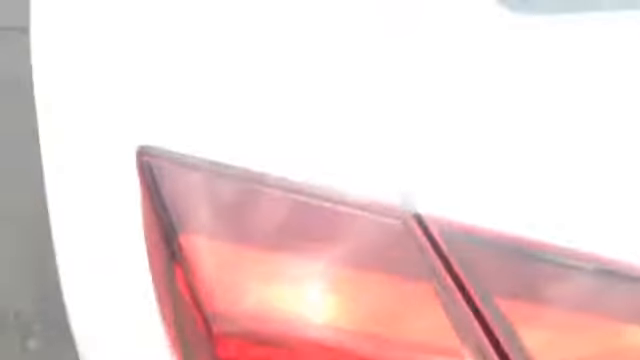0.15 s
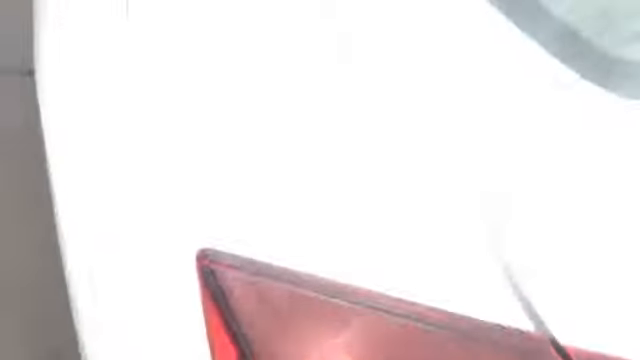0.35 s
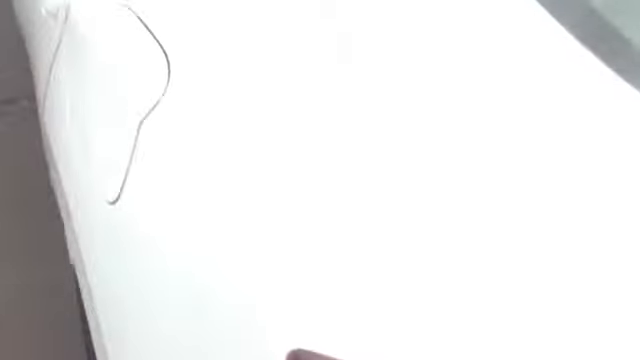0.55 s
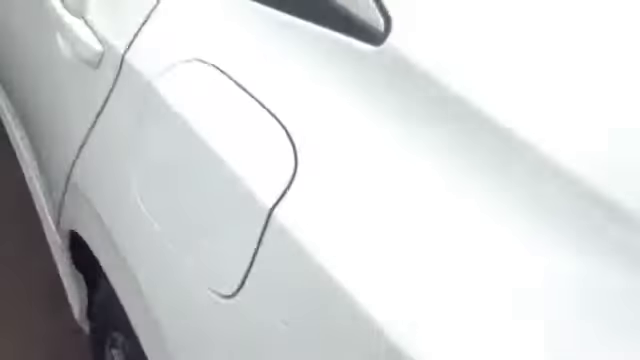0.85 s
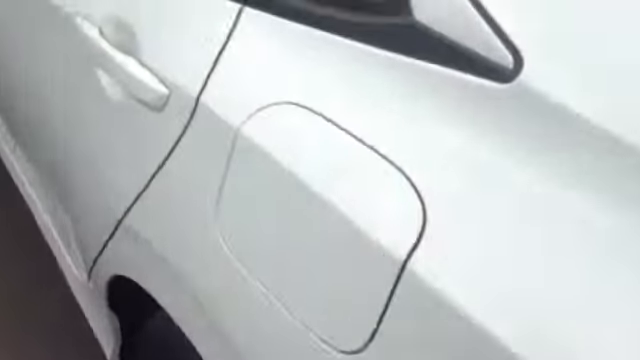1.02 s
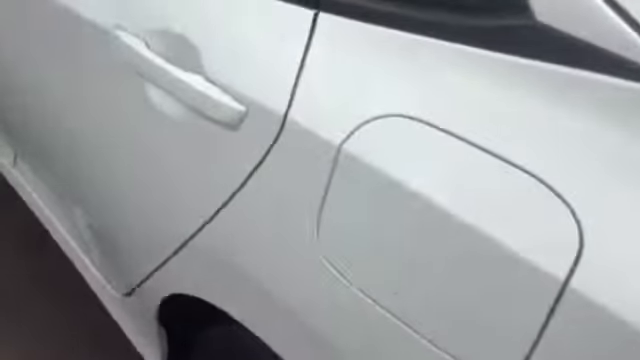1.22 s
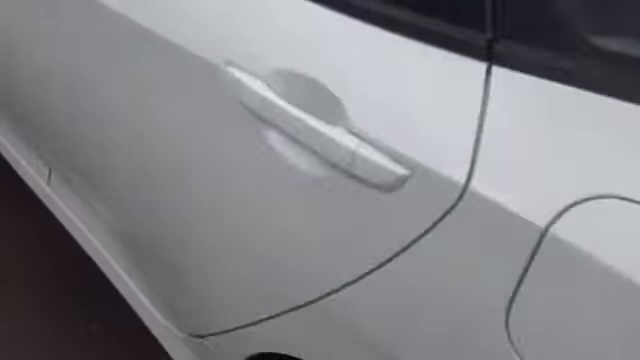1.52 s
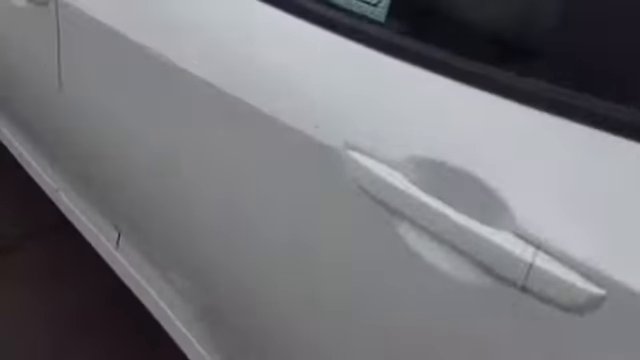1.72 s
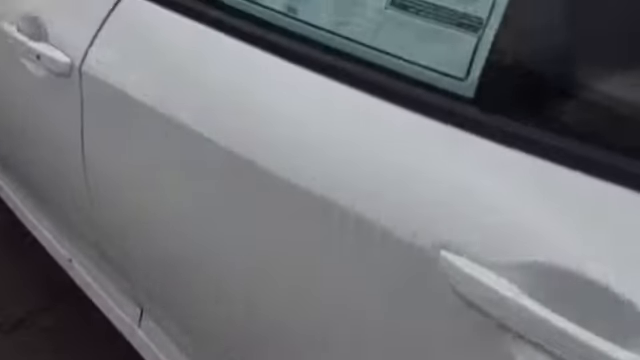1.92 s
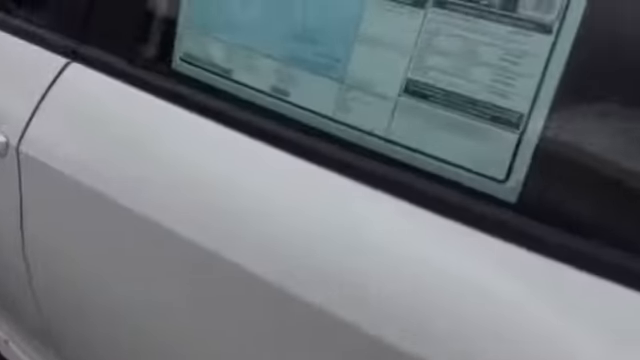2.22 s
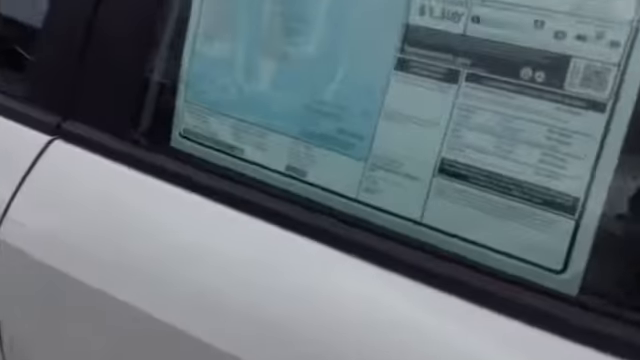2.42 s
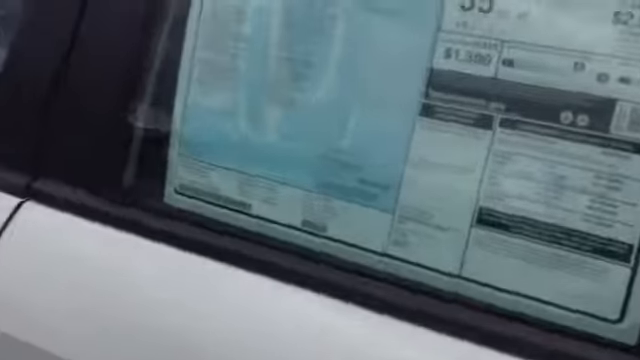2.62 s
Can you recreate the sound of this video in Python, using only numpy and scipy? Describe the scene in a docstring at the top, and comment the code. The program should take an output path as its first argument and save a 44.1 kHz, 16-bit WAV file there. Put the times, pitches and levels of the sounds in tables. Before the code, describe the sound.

A car trunk lid slams shut close by with a clattering latch and a short boom. Faint gritty footsteps, scuffs and tiny metallic jingles follow over distant traffic, ending with a brief rub near the microphone.

```python
"""A car's trunk lid is shut outdoors: the latch clatters home and rings the steel, the lid lands on
its rubber seal, the body booms and loose trim rattles, with a dull tail from the surroundings.
Someone walks along the car with faint taps, crunching grit, scuffs and small metallic jingles.
Distant traffic hums underneath; at the end something rubs close by with a hiss and a rumble."""
import sys
import numpy as np
from scipy import signal
from scipy.fft import irfft
from scipy.io import wavfile

SR = 44100
rng = np.random.default_rng(int(sys.argv[2]) if len(sys.argv) > 2 else 0)


def inscribe(sig):
    """Save sig as 16-bit PCM at rate SR to the path in sys.argv[1].

    A 1-D sig is mono; a 2-D sig holds one channel per row.
    Samples are clipped to [-1, 1] before scaling.
    """
    pcm = np.round(np.clip(np.atleast_2d(sig).T, -1, 1) * 32767)
    wavfile.write(sys.argv[1], SR, pcm.astype(np.int16))


N = 121275
T = np.arange(N) / SR


def from_db(db):
    """Decibels to gain."""
    return 10 ** (np.asarray(db) / 20)


def noise(spectrum):
    """Noise at rms 1, coloured by rows of freq_hz, relative_db."""
    hz, db = np.transpose(spectrum)
    freqs = np.maximum(np.arange(N // 2 + 1) * SR / N, 1)
    low_rolloff = np.minimum(freqs / hz[0], 1) ** 2
    gain = from_db(np.interp(np.log(freqs), np.log(hz), db)) * low_rolloff
    x = irfft(gain * np.exp(2j * np.pi * rng.random(len(freqs))), N)
    return x / x.std()


def burst(start_s, attack_s, t60_s):
    """Envelope that rises quickly and dies away."""
    age = np.maximum(T - start_s, 0)
    return np.minimum(age / attack_s, 1) * from_db(-60 * age / t60_s)


def ring(start_s, hz, t60_s):
    """One struck mode: a decaying sine."""
    age = np.maximum(T - start_s, 0)
    return np.sin(2 * np.pi * hz * age) * from_db(-60 * np.minimum(age / t60_s, 10))


def grain(depth_db, grain_s):
    """Flickering gain: the fast, uneven catching of two sliding surfaces."""
    knots = np.arange(0, T[-1] + grain_s, grain_s)
    return from_db(depth_db * np.interp(T, knots, rng.standard_normal(len(knots))))


def butter(x, hz, kind):
    """Gentle low- or high-pass."""
    return signal.sosfilt(signal.butter(2, hz, kind, fs=SR, output="sos"), x)


# Low wash of the road: freq_hz, relative_db
TRAFFIC_COLOUR = [(25, -23), (45, -34), (70, -9), (100, -12.5), (135, -3.5), (200, 2.5), (300, -1),
                  (380, 1), (520, -8), (680, -4), (880, -1.5), (1300, -11), (2500, -15.5), (3200, -22),
                  (4000, -25), (7000, -30.5), (15000, -32)]

def traffic():
    """Distant traffic blends into a steady, dark bed."""
    return from_db(-52) * noise(TRAFFIC_COLOUR)


# Brushes of shoes and clothing: peak_s, level_db, width_s, relative_hiss_db
SCUFFS = [(0.525, -75, 0.025, 0), (0.723, -64, 0.16, -24), (0.928, -69.5, 0.06, 3),
          (1.075, -59.5, 0.058, -7.5), (1.61, -69, .08, -4), (1.82, -64.5, 0.06, -4.5),
          (2.367, -56, 0.069, -9.5)]
# Midrange swish and the airy hiss on top: freq_hz, relative_db
SWISH_COLOUR = [(300, -15), (1500, 4.5), (2500, 0), (5000, -9.5), (9000, -25), (15000, -50)]
AIR_COLOUR = [(4000, -3), (8000, -11), (11000, 1), (13000, -4), (15000, -7.5)]

def scuffs():
    """Shoes and cloth slide in soft, grainy swishes that swell and fade."""
    swish, hiss = noise(SWISH_COLOUR), noise(AIR_COLOUR)
    out = 0
    for peak_s, db, width_s, hiss_db in SCUFFS:
        swell = np.exp(-.5 * ((T - peak_s) / width_s) ** 2)
        out += from_db(db) * swell * (swish + from_db(hiss_db) * hiss)
    return out * grain(depth_db=1.5, grain_s=0.0053)


# Tiny metal touches: start_s, level_db
JINGLES = [(.925, -60), (.945, -59), (1.101, -49.5), (1.122, -61), (2.357, -48.5)]
# Their thin sparkle: freq_hz, relative_db
JINGLE_COLOUR = [(7000, -9), (9000, -15), (10300, -2), (11000, -2), (12200, 1), (13500, -5), (15000, -8.5)]

def jingles():
    """Something small and metallic, perhaps keys, shifts with the walk."""
    envelope = sum(from_db(db) * burst(start_s, attack_s=.003, t60_s=0.07) for start_s, db in JINGLES)
    return noise(JINGLE_COLOUR) * envelope


# Shoe taps: start_s, level_db, pitch_hz, relative_knock_db
STEPS = [(.437, -38.5, 890, -1.5), (.517, -40.5, 520, -12), (0.7582, -31.5, 850, -12),
         (0.9522, -30, 1090, -19), (1.014, -37, 1500, -28), (1.809, -34, 1560, -6),
         (1.8768, -25, 1470, -13), (2.121, -37, 1500, 6), (2.523, -33.5, 1530, -24)]
# Grit under a sole: start_s, level_db, t60_s
CRUNCHES = [(0.438, -55, 0.048), (1.014, -50.5, 0.031), (1.04, -59, .05), (1.064, -53, .07),
            (1.869, -47.5, 0.041), (1.885, -46, 0.065), (2.119, -70, 0.035), (2.31, -41, 0.058),
            (2.33, -42.5, 0.053), (2.3566, -39, 0.049), (2.4065, -49, 0.17)]
# Tone of the grit: freq_hz, relative_db
GRIT_COLOUR = [(100, 0), (200, 10), (600, 11), (1800, 0), (4000, -2), (8000, -8), (12000, -11),
               (15000, -4.5)]

def footsteps():
    """Shoes hit the paving with a dead tap, a hollow knock of the sole and a click; grit crunches."""
    grit = noise(GRIT_COLOUR)
    taps = 0
    for start_s, db, pitch_hz, knock_db in STEPS:
        tap = from_db(4) * ring(start_s, pitch_hz, t60_s=2.8 / pitch_hz)  # gone in 2.8 cycles
        knock = from_db(knock_db) * ring(start_s, hz=593, t60_s=0.015)
        click = from_db(-14.5) * grit * burst(start_s, attack_s=.0001, t60_s=0.0034)
        taps += from_db(db) * (tap + knock + click)
    crunch = sum(from_db(db) * burst(start_s, 0.0016, t60_s) for start_s, db, t60_s in CRUNCHES)
    return grit * crunch + butter(taps, 378, "high")


# Swell of the rub: time_s, hiss_db, rumble_db
RUB_SWELL = [(2.49, -76, -77), (2.565, -55.5, -58), (2.61, -49, -54), (2.64, -44.5, -49),
             (2.66, -42.5, -40.5), (2.688, -42.5, -37), (2.71, -42, -47), (2.75, -42, -51)]
# Its bright and dark layers: freq_hz, relative_db
RUB_HISS_COLOUR = [(500, 2), (800, -6), (1300, -3.5), (1900, -2), (2200, 3), (3000, 1.5), (3600, -2.5),
                   (5000, -3), (6300, -13.5), (7200, -7), (8400, -17), (9800, 0.5), (11000, -13),
                   (12200, 0), (13500, -17), (15000, -10.5)]
RUB_RUMBLE_COLOUR = [(130, -19), (220, -9.5), (310, 0), (400, 0.5), (500, -11), (700, -15.5), (1200, -35)]

def rub():
    """A close rub swells as a hiss and rumbles where it presses hardest."""
    time_s, hiss_db, rumble_db = np.transpose(RUB_SWELL)
    hiss = noise(RUB_HISS_COLOUR) * from_db(np.interp(T, time_s, hiss_db, left=-120))
    rumble = noise(RUB_RUMBLE_COLOUR) * from_db(np.interp(T, time_s, rumble_db, left=-120))
    return (hiss + rumble) * grain(depth_db=0.79, grain_s=0.0028)


# Tone of the outdoor reflections: freq_hz, relative_db
ECHO_COLOUR = [(80, 1), (180, 4.5), (320, -3), (600, 1.5), (2000, -8), (6000, -14), (15000, -10)]

def surroundings(x):
    """The ground and nearby cars scatter back a weak, dull tail."""
    tail = noise(ECHO_COLOUR) * burst(start_s=0.0073, attack_s=0.0089, t60_s=0.44)
    tail /= np.sqrt(np.sum(tail ** 2))
    return from_db(-25) * signal.fftconvolve(x, tail)[:N]


STRIKE_ATTACK_S = 0.00068  # hard edge of the trim and latch hits
# Loose trim hits: start_s, level_db
RATTLES = [(0.087, -41), (0.097, -45), (0.109, -39), (.1222, -34.5), (0.1416, -30), (0.147, -46)]
# Their bright sizzle: freq_hz, relative_db
RATTLE_COLOUR = [(2000, -31), (5000, 8), (8000, -6), (11000, 1.5), (15000, -7)]

def trim():
    """The blow shakes loose trim into bright rattles, each starting with a snap."""
    out = 0
    for start_s, db in RATTLES:
        snap = from_db(2) * burst(start_s, STRIKE_ATTACK_S, t60_s=0.0072)
        decay = burst(start_s, STRIKE_ATTACK_S, t60_s=0.067)
        out += from_db(db) * noise(RATTLE_COLOUR) * (snap + decay)
    return out


# The lid lands on its rubber seal and settles: start_s, level_db
LANDINGS = [(0.0909, -13.5), (0.1094, -8.4), (0.1169, -5.5), (0.1236, -5.5), (.1328, -0.6), (.1593, -12.5)]
# Boom of the body and the trunk's air: pitch_hz, level_db, t60_s
BODY_MODES = [(83, -42, .15), (124.3, -39, 0.33), (142, -31, 0.32), (167.6, -26, 0.34),
              (213.4, -24.5, 0.28), (251, -20, 0.17), (280.8, -12.5, .155), (304, -22, 0.1),
              (348.4, -14, .13), (415, -34.5, 0.2), (485.5, -22, 0.16), (523, -28, .15)]

def boom():
    """Soft pushes through the seal drive the low modes of the body."""
    contact_s = 0.0013
    push = 0
    for start_s, db in LANDINGS:
        progress = np.clip((T - start_s) / contact_s, 0, 1)
        pulse = np.sin(np.pi * progress) ** 2 * 2 / (contact_s * SR)  # unit area
        push += from_db(db) * pulse
    body = sum(from_db(db) * ring(0, hz, t60_s) for hz, db, t60_s in BODY_MODES)
    return butter(signal.fftconvolve(push, body)[:N], 139, "high")


# Metal hits of latch and lid: start_s, level_db, lowpass_hz
LATCH_STRIKES = [(0.0618, -33.5, 2300), (.068, -41, 4500), (0.0809, -17, 6100), (0.0873, -24, 15000),
                 (.0965, -14.5, 6300), (0.1016, -15.5, 7000), (.111, -16, 11900), (0.1183, -20.5, 15000),
                 (0.129, -24, 7050), (.1425, -25, 15000), (0.154, -29, 2780)]
# Ring of the lid's steel: pitch_hz, relative_db, t60_s
STEEL_MODES = [(744, -19, 0.21), (846, -13, 0.1), (1050, -16, 0.18), (1168, -9.5, 0.13), (1448, -12, 0.099),
               (1486, -5.5, 0.074), (1555, -11, 0.12), (1631, -10, 0.15), (1726, -17, 0.15),
               (1846, -10.5, 0.099), (2130, -6, 0.067), (2280, -8.5, 0.056), (2440, -12, 0.099),
               (2569, -6.5, 0.085), (2680, -12, 0.069), (3170, -16.5, 0.088), (4226, -17, .1)]
# Noisy bite of each hit: freq_hz, relative_db
CLATTER_COLOUR = [(130, -20), (220, -1), (350, -4), (550, -5), (1000, 1), (1800, -1), (2700, -4.5),
                  (3400, -10), (5500, -11), (8000, -25.5), (15000, -26)]

def latch():
    """Each metal strike gives a dense clatter and rings the steel's modes in a fresh balance."""
    out = 0
    for start_s, db, lowpass_hz in LATCH_STRIKES:
        signs = rng.choice([-1, 1], len(STEEL_MODES))
        strengths = signs * from_db(rng.normal(0, 1.7, len(STEEL_MODES)))
        steel = sum(strength * from_db(mode_db) * ring(start_s, hz, t60_s)
                    for strength, (hz, mode_db, t60_s) in zip(strengths, STEEL_MODES))
        clatter = noise(CLATTER_COLOUR) * burst(start_s, STRIKE_ATTACK_S, t60_s=.068)
        out += from_db(db) * butter(clatter + from_db(-5.5) * steel, lowpass_hz, "low")
    return out


def scene():
    """The trunk slam up front, then the walk and the rub, over traffic, in mono."""
    trunk = latch() + boom() + trim()
    outdoors = traffic() + surroundings(trunk)
    walk = footsteps() + jingles() + scuffs()
    return (trunk + outdoors + walk + rub())[None]


def record(dry):
    """A steep low-pass takes off the very top."""
    cutoff_hz = 15500
    return signal.sosfilt(signal.ellip(12, .1, 80, cutoff_hz, fs=SR, output="sos"), dry)


dry = scene()
out = record(dry)
inscribe(out)
```